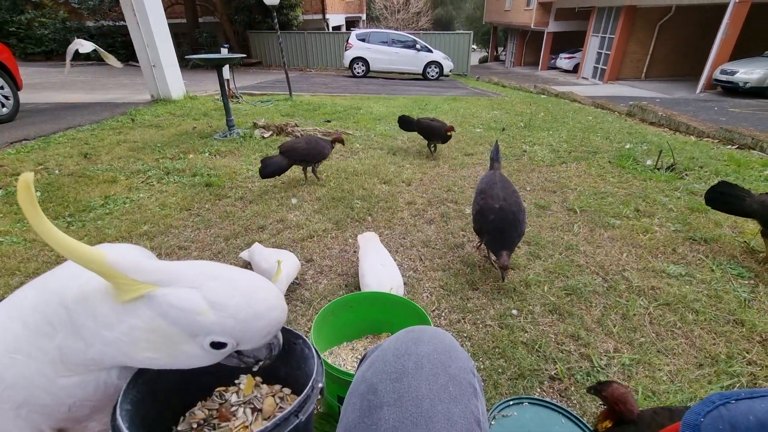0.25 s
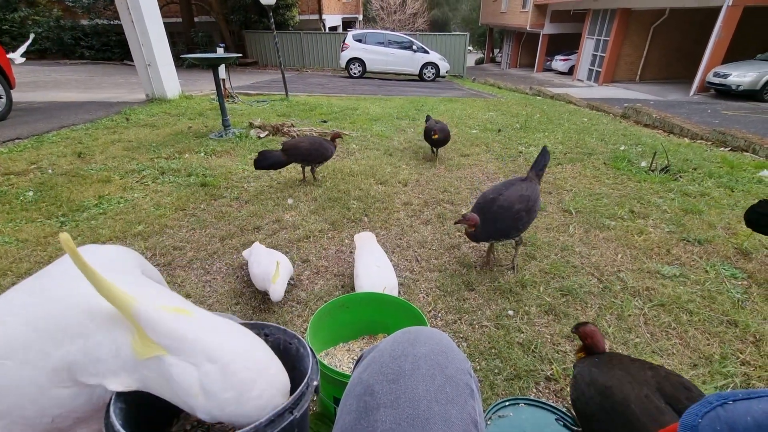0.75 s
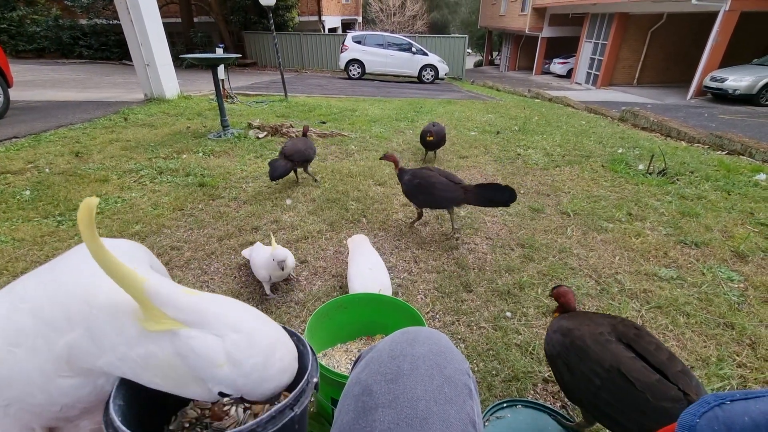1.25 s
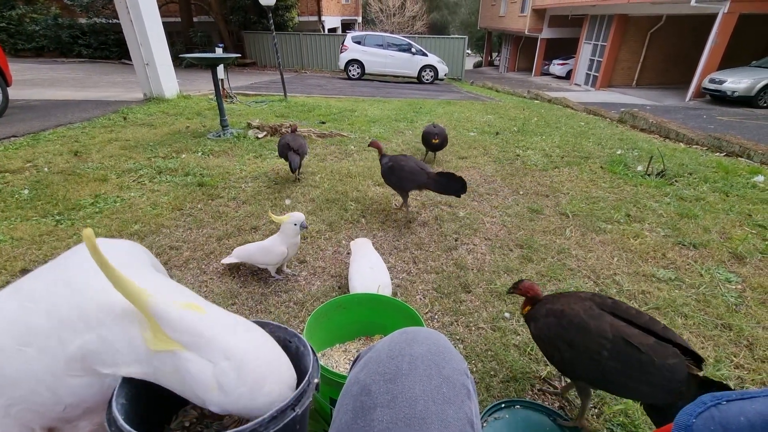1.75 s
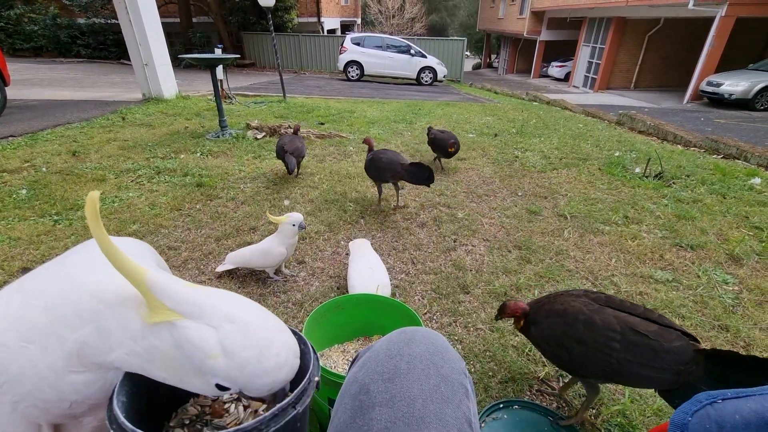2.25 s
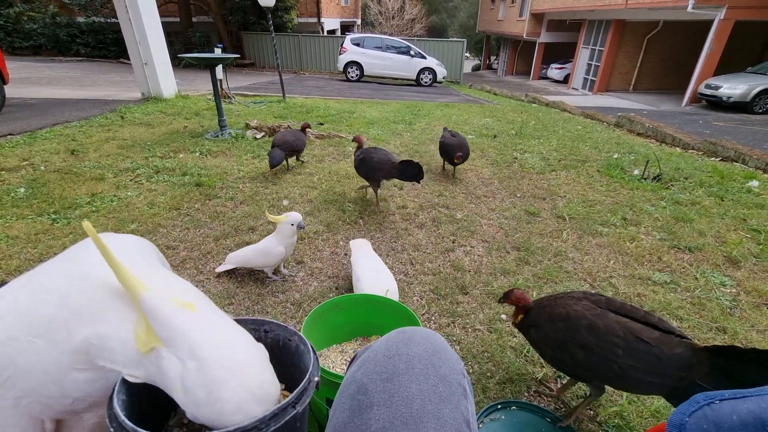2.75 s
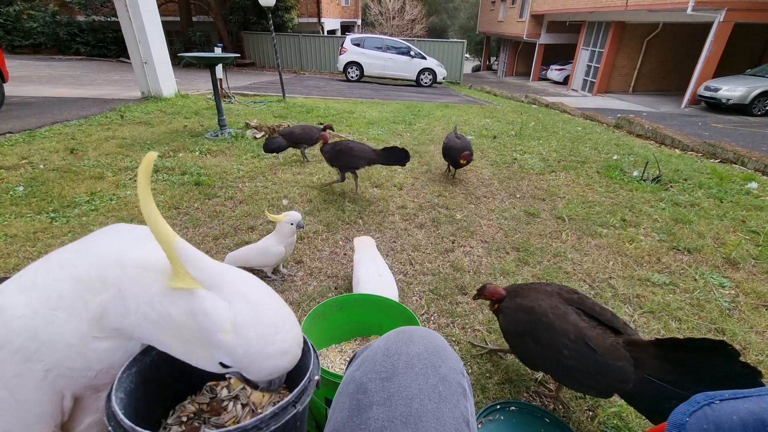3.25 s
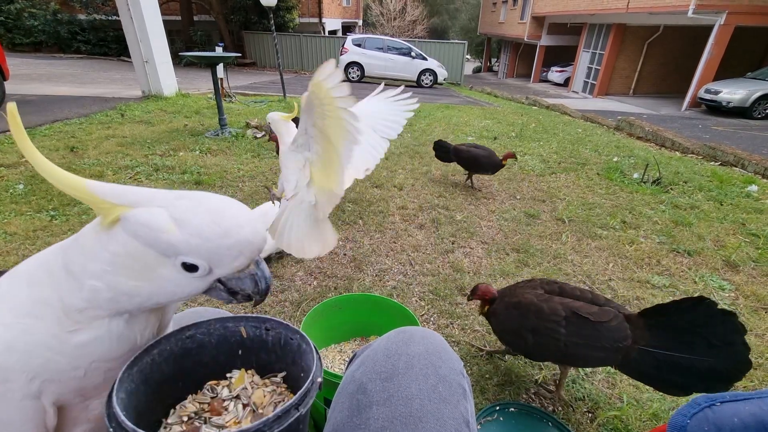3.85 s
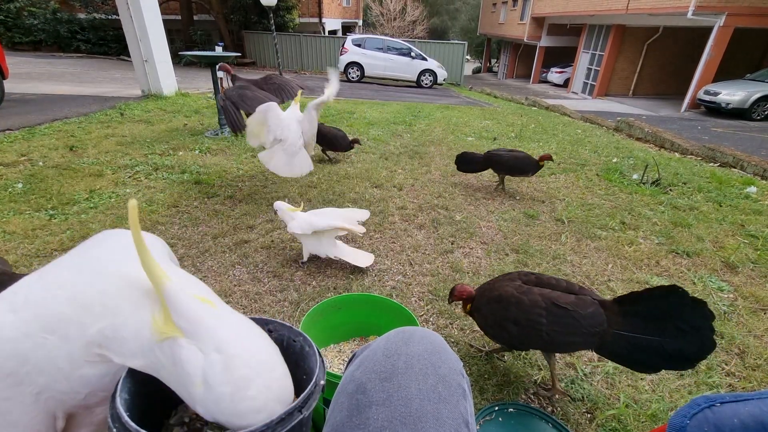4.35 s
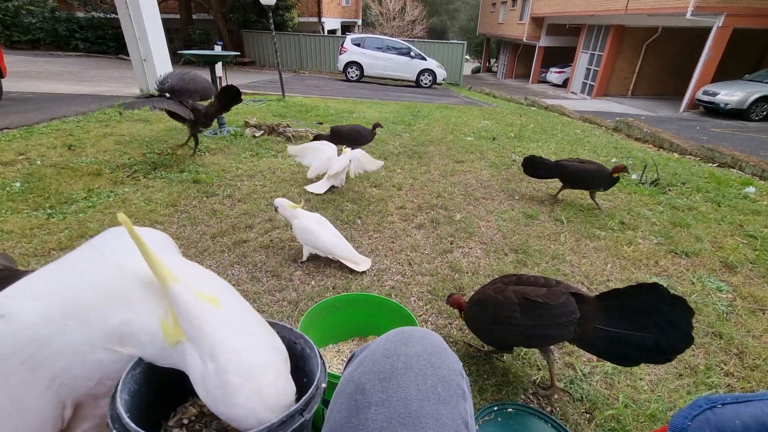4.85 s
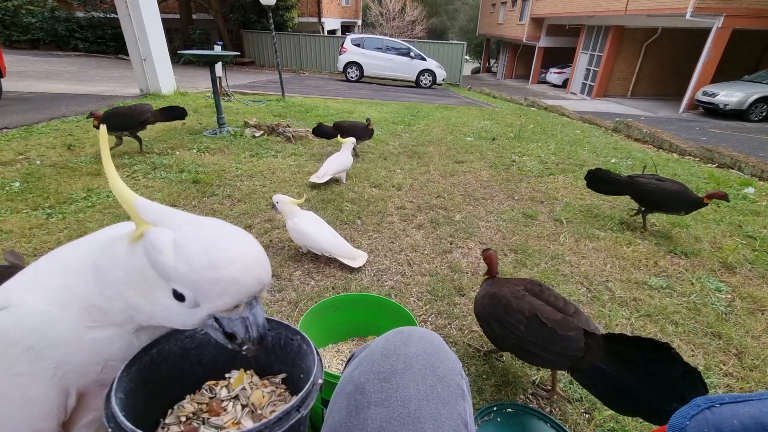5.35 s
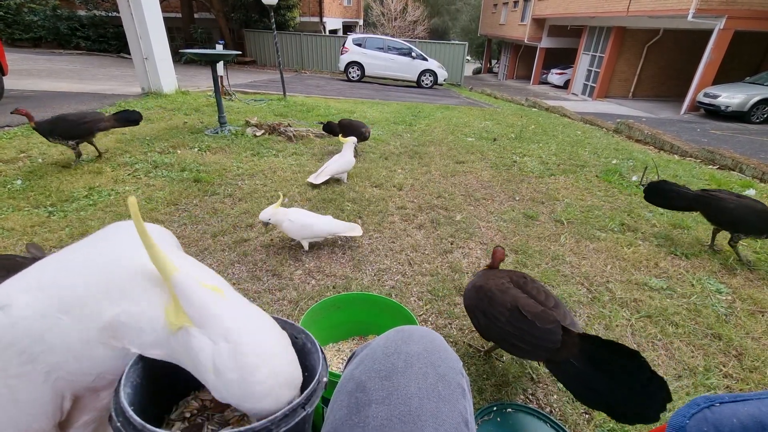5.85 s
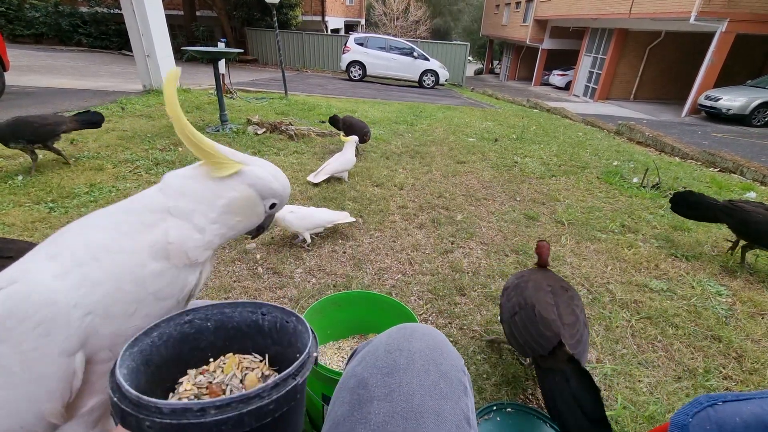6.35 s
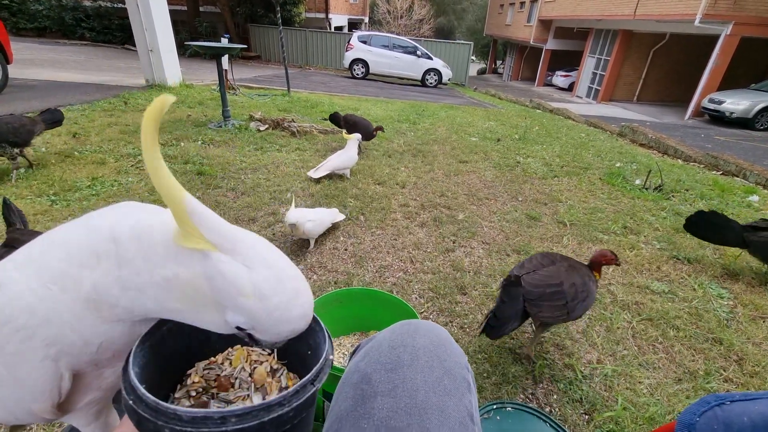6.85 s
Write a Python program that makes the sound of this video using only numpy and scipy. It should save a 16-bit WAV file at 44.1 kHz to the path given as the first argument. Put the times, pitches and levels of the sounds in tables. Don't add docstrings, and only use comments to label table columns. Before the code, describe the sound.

Outdoors on a lawn between brick buildings, dry seed husks crack irregularly in the near foreground, with short crunches and tiny ticking crumbs. Faint, reverberant cheeps and rising whistles come early, then fluttering wingbeats burst through the middle over the cracking. Another group of distant whistles overlaps the flapping; later the beak rakes noisily through the seeds. A quiet, low road roar and wavering engine hum continue throughout.

```python
import sys
import numpy as np
from scipy import signal
from scipy.io import wavfile

SR = 44100
rng = np.random.default_rng(int(sys.argv[2]) if len(sys.argv) > 2 else 0)


def materialize(psi):
    bounded = np.clip(np.atleast_2d(psi).T, -1, 1)
    quanta = np.round(bounded * 32767).astype(np.int16)
    wavfile.write(sys.argv[1], SR, quanta)


def volts_from_decibels(level):
    exponent = np.asarray(level, float) / 20
    return 10 ** exponent


N = 312669
LEFT_LEAD, RIGHT_LEAD = 15, 9


def rms_one(x):
    return x / np.sqrt(np.mean(x ** 2) + 1e-20)


def in_time(rows):
    s, *columns = np.transpose(rows)
    return [np.interp(np.arange(N) / SR, s, column) for column in columns]


def at_hz(points, hz):
    table = np.array(points)
    return np.interp(np.log(hz), np.log(table[:, 0]), table[:, 1])


def drift(rate_hz):
    r = np.exp(-80 * np.pi * rate_hz / SR)
    white = rng.standard_normal(N // 40 + 2002)
    slow = signal.lfilter([1], [1, -2 * r, r * r], white)[2000:]
    return np.interp(np.arange(N) / 40, np.arange(len(slow)), rms_one(slow))


def late(x, count):
    return np.concatenate([np.zeros(count), x[:len(x) - count]])


def band(x, low_hz, high_hz):
    return signal.sosfilt(signal.butter(2, [low_hz, high_hz], "band", fs=SR, output="sos"), x)


def swells(rows, rise_db_per_s, fall_db_per_s):
    t = np.arange(N) / SR
    bursts = []
    for s, hold, db in rows:
        rise = rise_db_per_s * np.maximum(s - t, 0)
        fall = fall_db_per_s * np.maximum(t - s - hold, 0)
        bursts.append(db - rise - fall)
    return np.max(bursts, axis=0)


# pitch_hz, likeness (0 to 1)
LIKENESS = [(60, 0.92), (200, 1), (400, 0.5), (800, 0.39), (1500, 0.79), (4000, 0.023), (15000, 0.023)]
# pitch_hz, left_minus_right_db
LEAN = [(60, -2), (240, -1), (950, -3), (3770, -7.5), (15000, 0)]


def banded(white, spectrum, patchy_db, tilt_db=0):
    out, power, together = 0, 0, drift(2.5)
    edges = 21000 / 2 ** np.arange(10, -.1, -1 / 3)
    for k, (low, high) in enumerate(zip(edges, edges[1:])):
        hz = np.sqrt(low * high)
        if hz < spectrum[0][0]:
            continue
        both, left, right = band(white[k % 2], low, high)
        alike = np.clip(at_hz(LIKENESS, hz), 0, 1)
        shared = np.array([both, late(both, LEFT_LEAD)])
        pair = np.sqrt(alike) * shared + np.sqrt(1 - alike) * np.array([left, right])
        patches_db = patchy_db * (0.63 * together + drift(5.44))
        level_db = at_hz(spectrum, hz) + tilt_db * np.log2(hz / 7500) + patches_db
        out = out + volts_from_decibels(level_db) * pair * volts_from_decibels(at_hz(LEAN, hz) / 2 * np.array([[1], [-1]]))
        power += volts_from_decibels(2 * at_hz(spectrum, hz)) * 2 * (high - low) / SR
    top = signal.cheby2(10, 40, 15900 * 1.02, fs=SR, output="sos")
    return signal.sosfilt(top, out) / np.sqrt(power)


# pitch_hz, level_db (per Hz)
TRAFFIC = [(13, -38), (22, -9.5), (77, 2), (158, -5.5), (553, -9.5), (635, -13.5), (1020, -11),
           (1550, -19.5), (2690, -32.5), (3870, -42), (6560, -63), (9680, -113), (14300, -59), (15500, -53),
           (16900, -83)]


def traffic():
    return volts_from_decibels(-42 + 1.5) * banded(rng.standard_normal((2, 3, N)), TRAFFIC, patchy_db=2.0)


# time_s, level_db
DRONE = [(0, -31.5), (.4, -36), (.9, -38), (1.3, -39), (1.75, -40.5), (2.03, -36.5), (2.4, -49),
         (3.1, -45.5), (4.2, -43), (4.9, -52), (6.3, -45.5), (7.09, -40)]


def engine():
    t, (level_db,) = np.arange(N) / SR, in_time(DRONE)
    low = 0
    for hz, db in [(65, -6.5), (90, -7)]:
        turning = 2 * np.pi * np.cumsum(hz * (1 + 0.0534 * drift(3.39))) / SR
        low = low + volts_from_decibels(db + 4.05 * drift(3.3)) * np.sin(turning)
    whine = volts_from_decibels(-66.0 + 0.92 * drift(0.69)) * np.sin(2 * np.pi * 1246 * t + 0.61 * drift(5.0))
    return volts_from_decibels(level_db) * low * volts_from_decibels([[-.8], [.8]]) + whine * volts_from_decibels([[-3], [3]])


# start_s, hold_s, level_db
PUSHES = [
    (0, 0.026, -30),
    (1.2, 0.025, -48),
    (1.95, 0.12, -47),
    (3.55, 0.024, -35),
    (3.65, 0.0082, -30.5),
    (4.36, 0.0044, -28),
    (6.08, 0.34, -37.5),
]


def thumps():
    rest_db, rise_db_per_s, fall_db_per_s = -46, 115, 102
    level_db = np.maximum(rest_db, swells(PUSHES, rise_db_per_s, fall_db_per_s))
    air = band(rng.standard_normal((3, N)), 130, 520)
    pair = rms_one([air[0], late(air[0], LEFT_LEAD)] + .5 * air[1:])
    return volts_from_decibels(level_db - 13 + 4.3 * drift(32)) * pair


# start_s, hold_s, level_db
FLAPS = [(3.488, 0.067, -59), (3.572, .005, -50.5), (3.66, .005, -48), (3.767, 0.047, -52.5),
         (3.82, 0.05, -56.5), (4.0, .005, -56.5), (4.117, 0.026, -54.5), (4.2, 0.077, -54.5),
         (4.3, .01, -58), (4.358, .005, -45.5), (4.52, 0.043, -52), (4.823, 0.029, -54), (4.92, .02, -57.5)]


def wing_beats_db(steepness=1):
    rise_db_per_s, fall_db_per_s = 151, 165
    return swells(FLAPS, rise_db_per_s * steepness, fall_db_per_s * steepness)


# time_s, level_db
RESTLESS = [(0, -66), (.6, -67.5), (.92, -66), (1.5, -72.5), (2.2, -73), (2.6, -72), (3.3, -72.5),
            (3.5, -53), (3.95, -65), (4.4, -56), (4.65, -59), (4.95, -61.5), (5.1, -67), (5.36, -70),
            (5.6, -69.5), (6.0, -63.5), (6.4, -70.5), (6.75, -65), (7.09, -70)]
# start_s, hold_s, level_db
DIGS = [(.389, .005, -69), (.844, 0.0047, -48), (1.197, .002, -60), (3.205, 0.0045, -51),
        (5.066, 0.0034, -54.5), (6.018, .005, -56.5), (6.055, 0.046, -50), (6.27, 0.099, -61.5),
        (6.11, 0.0061, -39), (6.15, 0.091, -43.5), (6.655, 0.0091, -58)]
# start_s, hold_s, level_db
BURIED = [
    (2.915, 0.03, -51),
    (2.99, 0.037, -63),
]


def stirring():
    rise_db_per_s, fall_db_per_s = 897, 320
    wings_db = wing_beats_db()
    seed_db = np.maximum(in_time(RESTLESS)[0], swells(DIGS, rise_db_per_s, fall_db_per_s))
    deep_db = swells(BURIED, rise_db_per_s, fall_db_per_s)
    level_db = np.max([wings_db, seed_db, deep_db], axis=0)
    shift_db = 1.5 * np.clip((wings_db - seed_db) / 4, 0, 1)
    shift_db = shift_db - 3 * np.clip((deep_db - seed_db) / 12, 0, 1)
    louder_is_brighter_db = 0.2021 * (level_db + 63.5)
    return level_db, np.minimum(louder_is_brighter_db + shift_db, 2.5)


# pitch_hz, level_db (per Hz)
RUSTLE = [(760, -23.5), (1300, 20.5), (1720, -22), (1890, 15), (2200, 5.5), (2640, 3), (5770, 0.5),
          (7230, 4.5), (9870, -26), (11600, -6), (14200, -11), (16200, -7), (16900, -76)]


def rustle():
    level_db, tilt_db = stirring()
    sizes = volts_from_decibels(2.0 * np.minimum(rng.exponential(1, (2, 3, N)), 5))
    grains_per_s = 900 * volts_from_decibels(7.0 * np.minimum(drift(45), 1.2))
    born = rng.random((2, 3, N)) < grains_per_s / SR
    grains = rng.standard_normal((2, 3, N)) * (1 + 5.0 * sizes * born)
    return volts_from_decibels(level_db + 7.5) * banded(rms_one(grains), RUSTLE, patchy_db=2.4, tilt_db=tilt_db)


def feathers():
    pitch_hz, width_hz = 7080, 900
    air = band(rng.standard_normal((2, N)), pitch_hz - width_hz / 2, pitch_hz + width_hz / 2)
    return volts_from_decibels(wing_beats_db(1 / 2) - 7 + 3.9 * drift(33)) * rms_one(air)


# time_s, husk_db
CRUMBS = [(1.162, -36), (1.423, -58), (1.667, -49), (1.708, -59), (1.971, -52), (2.05, -40), (2.06, -41),
          (2.0893, -48), (2.2856, -45), (2.7559, -41), (4.672, -50), (5.15, -47), (5.377, -54),
          (5.389, -48), (5.435, -47), (5.455, -44), (5.503, -44), (5.6922, -37.5), (5.929, -43),
          (6.5094, -50.5), (6.799, -43), (7.065, -56), (.096, -44), (.152, -47), (0.167, -49), (0.446, -46),
          (1.273, -50), (6.62, -55), (6.807, -44), (5.478, -45), (6.077, -43), (6.268, -43), (6.279, -46),
          (6.329, -47), (6.341, -48), (2.207, -56), (6.44, -57), (6.782, -52), (7.008, -54)]
# boom_db, wall_db, kernel_db, snap_db in that order
CRUMB_DB = [-1, -10, -8, -6.5]
# time_s, husk_db, tub_boom_db, tub_wall_db, snap_db
HUSKS = [(0.1311, -19, 3.5, 1, -2), (0.7155, -27, 4.5, 2, -7), (1.4936, -28.5, 9, 2, -0.5),
         (3.472, -36, -16, -20, -17), (3.4886, -31, 14, -15, -16), (3.796, -22, 0.5, -11, -3.5),
         (5.2618, -15, -25, -11.5, -9), (5.268, -32, -13, -13, -6), (5.286, -33.5, 6, -3, -9),
         (5.302, -27.5, -8, -8, -8), (5.4945, -27.5, -21, 3.5, 1), (5.51, -34.5, -15, -6, 13.5),
         (5.6233, -37.5, -24, -15, -8), (6.652, -31, -24, -14.5, -16)]
# time_s, husk_db, tub_boom_db, tub_wall_db, snap_db
SEEDS = [(0.3765, -24, 7, -7, 2.5), (1.1767, -24, 8, 2.5, -11), (1.1864, -33, 4, -1, -11),
         (1.358, -31, 15.5, 6, -2), (2.1685, -34.5, 12, 4, -19), (3.1904, -33, -7, -8, -11),
         (3.2015, -23.5, -2.5, -9, -1.5), (3.2117, -28.5, -5, -2, -13), (3.218, -33, -14, -6, -10),
         (3.645, -34.5, -7, 5.5, -12), (4.3459, -22, 2.5, -4, -4), (4.357, -30, 1, 0, -9),
         (4.4008, -31, -6, -0.5, -18), (5.294, -22, -2, -7, -9), (5.646, -32, 5, -1.5, 10),
         (5.686, -36, -3, -8, -4), (6.18, -25, -20, -30, -22), (6.2197, -29, 12, -6, -1),
         (6.253, -33, 5, -16, -2), (6.6568, -15.5, -4.5, 1, -3), (6.85, -25, 11, 13.5, 7.5),
         (6.858, -26.5, 8.5, 0, -3), (6.9891, -34, 16, 17.5, 0)]
# time_s, husk_db, tub_boom_db, tub_wall_db, kernel_db
KERNELS = [(0.405, -42, -5, -10, 3), (0.8274, -17, -1.5, -7, 8), (0.8458, -34, -13, -13, 1),
           (1.235, -54, -10, -7, 15), (1.2411, -31, -22, -4, 5), (1.2496, -54, -7, -4, 17),
           (2.9703, -42.5, 9, -18, 0), (2.9863, -38.5, -15, -12, 12), (3.539, -42.5, -6, 16, 6.5),
           (5.911, -50, -2, 0, 3), (6.014, -50, 15, -3, 0), (6.059, -46, 19.5, 10, 1),
           (6.102, -34.5, 11.5, -17, -5), (6.21, -39.5, 23, 14, 6)]


def bites():
    husk_kernel_db, seed_kernel_db, kernel_snap_db = -17.5, -12.5, -1.5
    rows = [(s, db, boom, wall, husk_kernel_db, snap) for s, db, boom, wall, snap in HUSKS]
    rows += [(s, db, boom, wall, seed_kernel_db, snap) for s, db, boom, wall, snap in SEEDS]
    rows += [(*row, kernel_snap_db) for row in KERNELS]
    rows += [(*row, *CRUMB_DB) for row in CRUMBS]
    return np.array(rows)


# pitch_hz, width_hz, splinter_t60_s, level_db, lean_to_left_db
BODIES = [
    (6350, 2200, 0.008, 3, -1.3),
    (557, 380, 0.0075, -7, .5),
    (1760, 560, 0.0065, .5, -1.8),
    (3080, 480, 0.009, 1.5, -2.2),
    (13400, 5000, 0.008, 4, .3),
]
FROM_RIGHT_S = [
    .828,
    1.241,
    1.249,
    2.987,
]


def cracks():
    rows, t, lead = bites(), np.arange(768) / SR, .002
    luck = rng.standard_normal((len(rows), 2, len(t)))
    luck[:, :, 88] = 1.8
    luck[:, 1] = .9 * luck[:, 0] + .4 * luck[:, 1]
    levels = rows[:, 1:] + rows[:, 1:2] * [0, 1, 1, 1, 1]
    shape = 0
    for b, (hz, width_hz, t60, level_db, lean_db) in enumerate(BODIES):
        creak_db = -109.0 * np.maximum(1 - t / lead, 0)
        decay_db = -60 * np.maximum(t - lead, 0) / t60
        ring = band(luck * volts_from_decibels(decay_db + creak_db), hz - width_hz / 2, hz + width_hz / 2)
        ring /= np.abs(ring).max(axis=2, keepdims=True)
        loudness = volts_from_decibels(levels[:, b] + level_db)[:, None, None]
        shape = shape + ring * loudness * volts_from_decibels([[lean_db], [-lean_db]])
    out = np.zeros((2, N + 2048))
    for s, (left, right) in zip(rows[:, 0], shape):
        at = round((s - lead) * SR) + 30
        on_right = np.min(np.abs(s - np.array(FROM_RIGHT_S))) < .004
        lean_db = -1.5 * on_right
        out[0, at + RIGHT_LEAD * on_right:][:len(t)] += left * volts_from_decibels(lean_db)
        out[1, at + LEFT_LEAD * (not on_right):][:len(t)] += right * volts_from_decibels(-lean_db)
    return out[:, :N]


def chirps(rows, second_db, waver, walls_db=0):
    out = np.zeros((2, N))
    for s, length, from_hz, to_hz, level_db in rows:
        at, u = round(s * SR), np.linspace(0, 1, round(length * SR))
        hz = from_hz + (to_hz - from_hz) * (1 - (1 - u) ** 1.25)
        phase = 2 * np.pi * np.cumsum(hz * waver[at:at + len(u)]) / SR
        swell = np.minimum(u / 0.29, 1) ** 0.7 * np.minimum((1 - u) * length / 0.009, 1)
        tone = np.sin(phase) + volts_from_decibels(second_db) * np.sin(2 * phase)
        tone = tone + volts_from_decibels(2.2 * second_db + 2) * np.sin(3 * phase)
        out[:, at:at + len(u)] += volts_from_decibels([[level_db], [level_db + walls_db]]) * swell * tone
    return out


def glide(rows, second_db, waver):
    t, (hz, level_db) = np.arange(N) / SR, in_time(rows)
    phase = 2 * np.pi * np.cumsum(hz * waver) / SR
    ends = np.minimum(t - rows[0][0], rows[-1][0] - t) / 0.0056
    opening = np.clip((t - rows[0][0]) / .03, 0, 1) ** 2
    overtones = volts_from_decibels(second_db) * np.sin(2 * phase) + volts_from_decibels(second_db - 16) * np.sin(3 * phase)
    return volts_from_decibels(level_db + 1) * np.clip(ends, 0, 1) * (np.sin(phase) + opening * overtones)


# start_s, length_s, from_hz, to_hz, level_db
PURE_BIRD = [(.2, .08, 2620, 2880, -47), (.45, .065, 2480, 2620, -59), (.19, .098, 3380, 3600, -66),
             (.476, .042, 3250, 3470, -61), (.67, .048, 3120, 3310, -47), (5.125, .105, 2440, 2640, -58),
             (5.22, .05, 2620, 2800, -58), (.27, .08, 3000, 3200, -55), (4.67, .07, 2420, 2600, -61),
             (1.93, .27, 4680, 4650, -63), (.225, .05, 4850, 4950, -68), (4.42, .04, 2660, 2560, -60),
             (4.752, .06, 4950, 4780, -65)]
# time_s, pitch_hz, level_db
PURE_RISE = [
    (2.185, 2396, -59),
    (2.245, 2345, -53.5),
    (2.255, 2413, -56),
    (2.385, 2710, -46),
    (2.429, 2755, -46),
    (2.455, 2980, -58),
]


def pure_bird(waver):
    second_db = -28
    return chirps(PURE_BIRD, second_db, waver) + glide(PURE_RISE, second_db, waver)


# start_s, length_s, from_hz, to_hz, level_db
THIN_BIRD = [
    (.315, .055, 4110, 4050, -52),
    (.345, .08, 4360, 4420, -58),
    (.54, .07, 4060, 4170, -55),
    (4.445, .035, 3500, 3480, -64),
    (4.742, .024, 3990, 3980, -57),
    (4.797, .038, 4000, 4250, -53),
    (4.84, .09, 4220, 4100, -66),
    (.27, .09, 4380, 4200, -62),
    (.42, .14, 4380, 4330, -64),
    (.61, .09, 4170, 4150, -63),
]
# time_s, pitch_hz, level_db
THIN_ARC = [
    (1.785, 4360, -60),
    (1.855, 4620, -47),
    (1.89, 4680, -45),
    (1.925, 4620, -54),
    (1.96, 4400, -62),
]


def thin_bird(waver):
    second_db = -22
    return chirps(THIN_BIRD, second_db, waver) + glide(THIN_ARC, second_db + 3.5, waver)


# start_s, length_s, from_hz, to_hz, level_db
REEDY_BIRD = [
    (.395, 0.092, 3130, 3100, -45.5),
    (.572, 0.13, 2926, 3057, -46),
    (4.757, .043, 2450, 2420, -51),
    (4.83, 0.047, 2775, 2810, -46.5),
    (4.858, 0.079, 2780, 2875, -43.5),
]
# time_s, pitch_hz, level_db
REEDY_CLIMB = [
    (4.462, 2804, -39.5),
    (4.486, 2820, -46.5),
    (4.528, 2810, -48),
    (4.652, 3196, -46),
    (4.665, 3131, -59),
]


def reedy_bird(waver):
    second_db = -13
    return chirps(REEDY_BIRD, second_db, waver) + glide(REEDY_CLIMB, second_db, waver)


# start_s, length_s, from_hz, to_hz, level_db
NEAR_BIRD = [
    (5.763, 0.012, 2980, 3020, -58),
    (5.78, 0.026, 3150, 3120, -63),
    (5.858, 0.027, 3170, 3020, -47),
    (5.887, .02, 3200, 3050, -61),
    (5.923, .012, 3080, 3100, -62),
    (5.947, .018, 3000, 3060, -56),
    (5.765, .012, 3580, 3600, -65),
    (5.95, .012, 3600, 3600, -61),
]


def near_bird(waver):
    return chirps(NEAR_BIRD, -32, waver, walls_db=-14)


def whistles():
    flutter, waver = volts_from_decibels(3.14 * drift(47)), 1 + 0.0065 * drift(78)
    voices = pure_bird(waver) + thin_bird(waver) + reedy_bird(waver) + near_bird(waver)
    return voices * flutter * (1 + 0.13 * drift(170))


def yard(x):
    t, t60_s = np.arange(SR) / SR, .74
    hits = (rng.random((2, SR)) < .02 + .5 * t) * (t > .018)
    echoes = rng.standard_normal((2, SR)) * hits
    dull = signal.sosfilt(signal.butter(1, 5800, fs=SR, output="sos"), echoes)
    tail = dull * volts_from_decibels(-60 * t / t60_s) + (echoes - dull) * volts_from_decibels(-60 * t / (0.1 * t60_s))
    return signal.fftconvolve(x[None], tail / np.sqrt(np.sum(tail ** 2) / 2), axes=1)[:, :N]


# start_s, length_s, centre_hz, level_db
CRUNCHES = [(0.694, 0.036, 2600, -33), (0.828, 0.085, 2700, -36.5), (1.241, 0.0062, 5200, -26.5),
            (2.913, 0.0292, 4100, -41), (2.989, 0.064, 2800, -37.5), (4.344, 0.039, 3200, -35.5),
            (6.7, 0.022, 5800, -55), (6.098, 0.039, 4000, -33), (6.171, 0.012, 4800, -25.5),
            (6.196, 0.016, 2400, -35), (6.25, 0.067, 5000, -49), (6.321, 0.039, 6000, -53),
            (3.52, .014, 4200, -41), (3.797, 0.0093, 7100, -29.5), (5.2, .018, 3200, -42),
            (6.66, 0.02, 6700, -42), (6.112, .014, 6500, -31), (6.6, .012, 4200, -47),
            (5.35, .035, 8100, -58), (2.235, .03, 6600, -59), (6.245, .008, 14000, -38),
            (4.1, .06, 7600, -53), (6.657, 0.0053, 1600, -35), (.828, .006, 840, -32),
            (4.5, .08, 13500, -51), (.372, .008, 8600, -36), (5.685, .014, 5000, -44),
            (3.2, .03, 7500, -59)]


def crunches():
    out = np.zeros(N)
    grit = rng.standard_normal(N) * volts_from_decibels(6.0 * np.minimum(drift(270), 1.3))
    for s, length, hz, level_db in CRUNCHES:
        at, u = round(s * SR), np.linspace(0, 1, round(length * SR))
        hollow = band(grit[at:at + len(u)], hz / 1.32, hz * 1.15)
        out[at:at + len(u)] += volts_from_decibels(level_db) * rms_one(hollow) * np.sin(np.pi * u) ** 0.2
    return np.array([late(out, RIGHT_LEAD) * volts_from_decibels(-7.5), out * volts_from_decibels(-3.0)])


def scene():
    near, (far, walls) = cracks() + crunches(), whistles()
    dull = signal.sosfilt(signal.butter(4, 7500, fs=SR, output="sos"), near[1])
    birds = np.array([late(far, count=22) * volts_from_decibels(-1.0), far * volts_from_decibels(11.0)])
    air_db = [[-2.5], [2.5]] + 0.77 * np.array([drift(40), drift(37)])
    echo = yard(volts_from_decibels(-32.0) * dull + volts_from_decibels(-4.5) * walls) * volts_from_decibels(air_db)
    return near + birds + echo + traffic() + rustle() + thumps() + engine() + feathers()


def low_pass(x):
    return signal.sosfilt(signal.butter(12, 17020, fs=SR, output="sos"), x)


def record(dry):
    dip = signal.sosfilt(signal.butter(1, [7800, 11500], "bandstop", fs=SR, output="sos"), dry)
    top = signal.cheby2(12, 60, 17300, fs=SR, output="sos")
    return low_pass(signal.sosfilt(top, 0.55 * dip + 0.43 * dry))


dry = scene()
out = record(dry)
materialize(out)
```